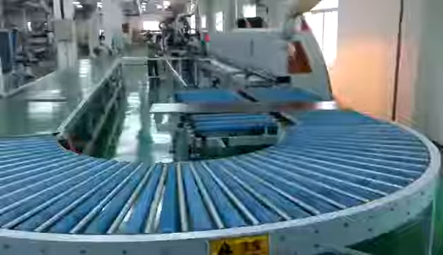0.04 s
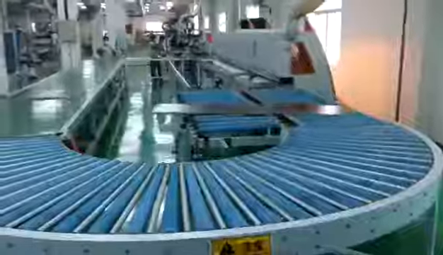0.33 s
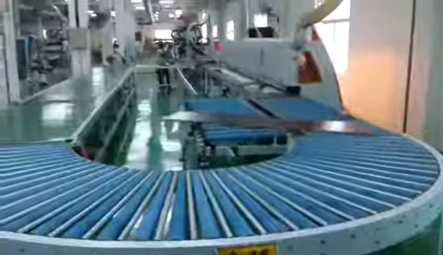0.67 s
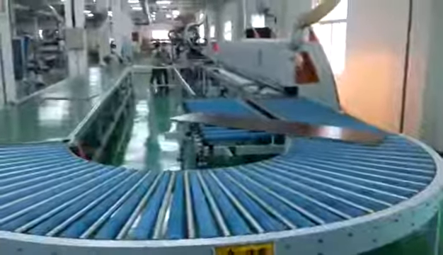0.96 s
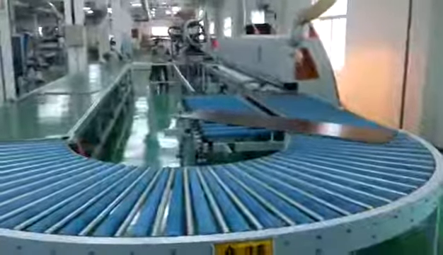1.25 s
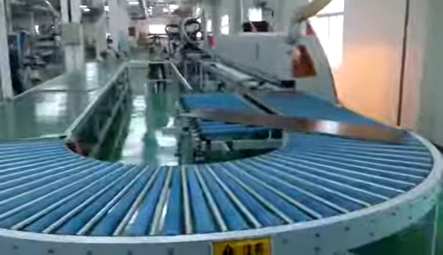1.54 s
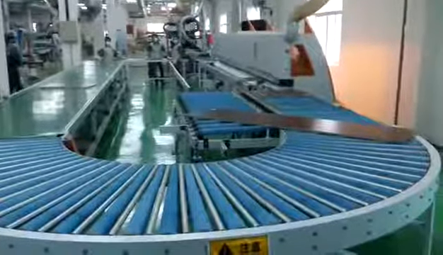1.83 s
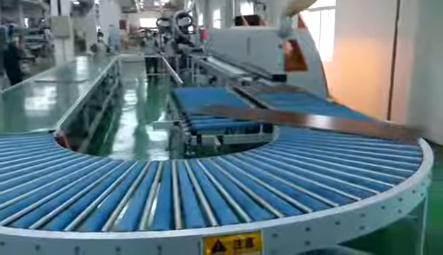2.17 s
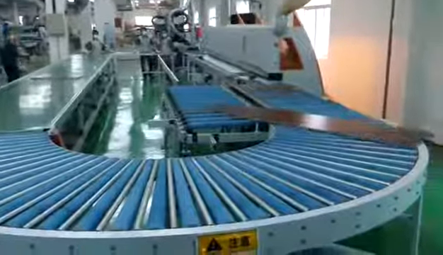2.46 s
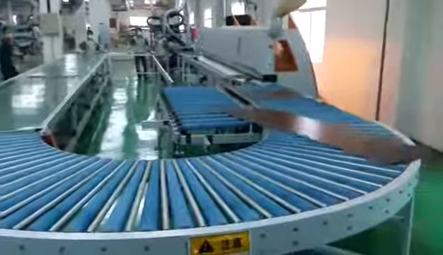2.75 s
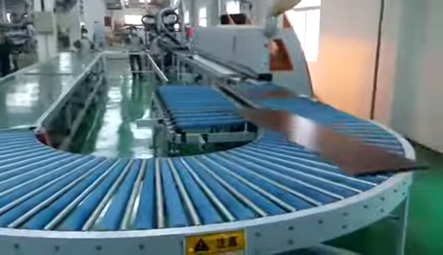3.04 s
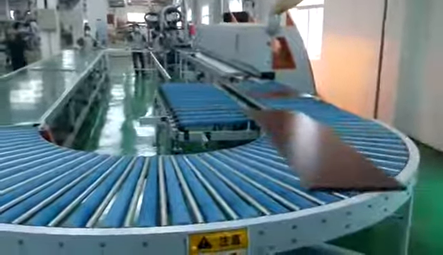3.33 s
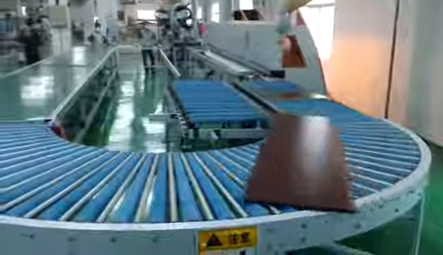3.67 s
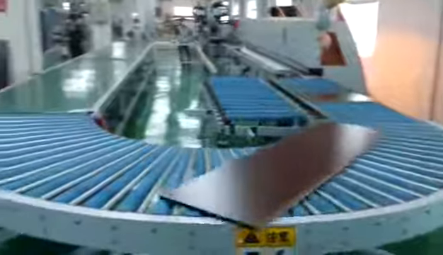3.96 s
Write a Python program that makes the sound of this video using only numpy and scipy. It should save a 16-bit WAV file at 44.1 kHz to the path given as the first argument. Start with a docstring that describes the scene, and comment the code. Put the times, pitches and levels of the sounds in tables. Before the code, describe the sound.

Dense woodworking machine noise fills a factory hall, with rasping cutters, hissing air and a whine. Close by, a roller conveyor rumbles and ticks; a board chatters on it, brushes the rail, then bumps dully near the end.

```python
"""Woodworking line in a factory hall

Cutters rasp, air rushes through the extraction, a spindle whines and motors hum. Close by, a roller
conveyor rumbles and carries a long board round its curve towards the listener; the board chatters,
brushes the rail, shudders and bumps. The broad sounds are noise shaped by filters.
The sound cuts in after a quarter second and swells to its full level."""
import sys
import numpy as np
from scipy import signal
from scipy.fft import rfft, irfft, next_fast_len
from scipy.io import wavfile
from scipy.ndimage import uniform_filter1d, map_coordinates

SR = 44100
rng = np.random.default_rng(int(sys.argv[2]) if len(sys.argv) > 2 else 0)


def inscribe(sig):
    """Save sig as 16-bit PCM at rate SR to the path in sys.argv[1].

    A 1-D sig is mono; a 2-D sig holds one channel per row.
    Samples are clipped to [-1, 1] before scaling.
    """
    pcm = np.round(np.clip(np.atleast_2d(sig).T, -1, 1) * 32767)
    wavfile.write(sys.argv[1], SR, pcm.astype(np.int16))


N = 176400

# machine levels before trims: time_s, roar_db, rasp_db, low_hiss_db, high_hiss_db
MACHINE_LEVELS = [(.45, -25.5, -24.5, -32, -28.5), (.6, -25.5, -24.5, -30.5, -27),
                  (.95, -24.5, -24.5, -32.5, -28.5), (1.09, -28.5, -25.2, -33.5, -31.5),
                  (1.18, -24, -24, -30, -28), (1.38, -28, -26, -34, -29), (1.5, -25.5, -24, -31.5, -29.3),
                  (1.9, -25.5, -24, -31, -29), (2.1, -25, -24.5, -33.5, -29.5),
                  (2.27, -27.5, -23.5, -31, -28.5), (2.54, -23.5, -25.5, -31, -30.5),
                  (2.63, -25, -23, -29.5, -30), (2.88, -26.5, -25.2, -31.5, -29.5),
                  (3, -29, -27.5, -33, -28.5), (3.15, -30, -26.5, -32.5, -28.5),
                  (3.5, -25.5, -24.5, -30, -29), (3.75, -27, -25.5, -31.6, -28.5), (4, -27, -26, -32, -30)]
# broad spectra of roar, rasp and hiss: frequency_hz, gain_db
ROAR_SPECTRUM = [(150, -26.5), (265, -5.5), (420, 0), (650, -7.5), (900, -2.5), (1150, 0.36), (1400, -3),
                 (1640, -11.5), (2000, -56)]
RASP_SPECTRUM = [(1450, -48), (1670, -7.5), (2050, -8), (2350, -4), (2750, .5), (2950, -12.5), (3250, -9),
                 (3450, -27.5), (3800, -53)]
LOW_HISS_SPECTRUM = [(2700, -31.5), (3300, -3), (3600, 0), (4200, -3), (4800, -1.5), (5300, -3), (5700, -2),
                     (5900, -13), (6400, -46)]
# the high hiss has a recorder's notch near 8 kHz: frequency_hz, gain_db
HIGH_HISS_SPECTRUM = [(5400, -48), (5750, -0.5), (6000, 4.5), (6400, -2), (7000, 0), (7400, -3), (7670, 1),
                      (7740, -7.5), (7830, -22.5), (8020, -57.5), (8300, -10), (8650, -19.5), (9100, -37.5)]
# resonances and notches: centre_hz, width_hz, gain_db
HOUSING_MODES = [(429, 18, -4.7), (493, 29, 6.8), (517, 14, 4.5), (633, 23, 5.7), (693, 36, 3.6),
                 (781, 14, 3.6), (865, 23, 4.5), (941, 18, -8.0), (1049, 29, -13.2), (1117, 29, -7.4),
                 (1161, 23, -4.4), (1273, 18, -6.0), (1405, 29, -4.1), (1533, 36, -2.4)]
CUTTER_MODES = [(1739, 14, -4.7), (1811, 58, 4.7), (1871, 23, 4.1), (1975, 23, 4.7), (2151, 23, 4.4),
                (2215, 23, 5.1), (2323, 36, 7.7), (2607, 14, -5.8), (2739, 23, -9.4), (2951, 14, 3.9),
                (3019, 36, 3.6), (3067, 23, -5.2), (3175, 18, -2.7), (3259, 23, -6.1)]
DUCT_MODES = [(3515, 36, 5.2), (3635, 58, 6.2), (3959, 18, -7.3), (4003, 36, 7.7), (4059, 18, -4.9),
              (4119, 36, 5.0), (4383, 23, 3.6), (4507, 45, 4.9), (4635, 36, 3.4), (4751, 58, -3.9),
              (4943, 14, -6.4), (5051, 14, -6.3), (5355, 36, 7.4), (5471, 58, 4.9)]
NOZZLE_MODES = [(5751, 18, -5.0), (5931, 18, -6.1), (6039, 18, -7.9), (6227, 23, 3.6), (6271, 18, -6.8),
                (6327, 58, 9.4), (6451, 45, 5.8), (6683, 36, 7.0), (6807, 58, 4.5), (6911, 18, -3.9),
                (7199, 58, 6.6), (7259, 18, -5.7), (7323, 36, 8.5), (7607, 14, -9.2)]
ROLLER_FRAME_MODES = [(880, 29, 8), (994, 29, 7.5), (1250, 35, 5.5), (2340, 36, 2)]
# spectral lines of motors and tools: pitch_hz, width_hz, level_db
HUM_LINES = [(97, 1.8, -37.5), (198, 2, -44), (388, 2, -41), (2332, 3, -44), (2407, 3, -42.5),
             (2653, 3, -41.5), (2783, 3, -47)]
# envelopes of spindle, air whistle and rumble (before its trim): time_s, level_db
WHINE_LEVELS = [(.45, -29.5), (.7, -29.5), (1.65, -28), (2.1, -33.5), (2.6, -34), (3.1, -40), (3.55, -49),
                (3.8, -36.5), (4, -35)]
WHISTLE_LEVELS = [(.5, -46), (.8, -44), (1.2, -47.5), (2.92, -48), (3.01, -33), (3.11, -46), (3.21, -45),
                  (3.27, -34), (3.37, -47), (3.56, -42), (3.7, -50)]
RUMBLE_LEVELS = [(.45, -32), (.7, -29.5), (1.1, -31.5), (1.4, -28), (1.7, -32), (2.3, -31), (2.85, -32),
                 (3.15, -34.5), (3.48, -29.5), (3.6, -23), (3.8, -27.5), (4, -27)]
# broad spectra of rumble, ticks and the board's sounds: frequency_hz, gain_db
RUMBLE_SPECTRUM = [(15, -48.5), (35, -16.5), (60, -11), (85, 0), (120, 1), (160, -2.5), (230, -6.5),
                   (330, -18), (600, -58.5)]
TICK_SPECTRUM = [(300, -18.5), (800, 1.5), (2600, 2.5), (4000, 0), (7400, -0.5), (7900, -39.5)]
CHATTER_SPECTRUM = [(250, -27), (400, -7.5), (620, -4.5), (880, 1.5), (1300, -1), (1700, -10.5),
                    (2500, -4.5), (3200, -17), (4500, -42)]
BRUSH_SPECTRUM = [(2500, -32.5), (4100, -3), (4900, -0.5), (6000, -1.5), (7500, -12), (7900, -34.5)]
BUMP_SPECTRUM = [(35, -35), (70, -3.5), (110, 6), (190, -7), (330, -6.5), (450, -18.5), (900, -47.5)]
# the board's contacts with rollers and rail: start_s, length_s, level_db
ROLLER_CHATTERS = [(2.2, .2, -30), (2.52, 0.5, -33.5)]
RAIL_BRUSHES = [(2.927, 0.63, -32.5)]
# its shudders against the frame: start_s, length_s, pitch_hz, level_db
FRAME_SHUDDERS = [(2.93, 0.33, 35.3, -35), (3.504, 0.15, 52, -30)]
# its bumps over the rollers: start_s, strength_db
ROLLER_BUMPS = [(3.555, -25.5), (3.65, -30), (3.89, -28.5)]

TIME_S = np.arange(N) / SR


def amp(db):
    """Amplitude grows tenfold for every 20 dB."""
    return 10 ** (np.asarray(db) / 20)


def unit_rms(x):
    """Normalisation to rms 1."""
    return x / np.sqrt(np.mean(x ** 2) + 1e-20)


def spectrum_db(points, hz):
    """Interpolation of gain on a logarithmic frequency axis."""
    point_hz, gain_db = np.transpose(points)
    return np.interp(np.log(hz + 1), np.log(point_hz + 1), gain_db)


def envelopes(rows):
    """Linear interpolation in time of each level column."""
    times, *columns = np.transpose(rows)
    return [np.interp(TIME_S, times, column) for column in columns]


def wobble(per_s):
    """Smooth random modulation: a spline through per_s knots a second."""
    knots = rng.standard_normal(int(N * per_s / SR) + 4)
    return map_coordinates(knots, [TIME_S * per_s])


def filtered(x, response):
    """Linear filtering: the spectrum is multiplied by a frequency response."""
    size = next_fast_len(N + SR // 2)
    return irfft(rfft(x, size) * response(np.fft.rfftfreq(size, 1 / SR)), size)[:N]


def rush(spectrum, modes=(), *, patchy_db):
    """Source and filter: noise with patches of random gain, shaped by spectrum and modes, at rms 1."""
    def response(f):
        resonance_db = sum(db * np.exp(-((f - hz) / width) ** 2) for hz, width, db in modes)
        return amp(spectrum_db(spectrum, f) + resonance_db)

    cells = signal.stft(rng.standard_normal(N), nperseg=512)[2]
    patches = uniform_filter1d(rng.standard_normal(cells.shape), size=7, axis=0)
    patches = unit_rms(uniform_filter1d(patches, size=9, axis=1))
    noise = signal.istft(cells * amp(patchy_db * patches), nperseg=512)[1][:N]
    return unit_rms(filtered(noise, response))


def blurred_tone(hz, width_hz):
    """Narrow-band noise of rms 1 is heard as an unsteady tone, blurred by the hall."""
    return unit_rms(filtered(rng.standard_normal(N), lambda f: 1 / (1 + ((f - hz) / width_hz) ** 2)))


def arch(start_s, length_s):
    """A half-sine envelope."""
    return np.sin(np.pi * np.clip((TIME_S - start_s) / length_s, 0, 1))


def strokes(rows):
    """The envelope of sustained contact: one steep-sided arch a row."""
    return sum(amp(db) * np.sqrt(abs(arch(start, length))) for start, length, db in rows)


def machine():
    """Common modulation: load flutters housing roar and cutter rasp, air flow the two hisses."""
    roar_db, rasp_db, low_db, high_db = envelopes(MACHINE_LEVELS)
    load_db, flow_db = 0.31 * wobble(24.23), 0.49 * wobble(18)
    roar = amp(roar_db - 0.5 + load_db) * rush(ROAR_SPECTRUM, HOUSING_MODES, patchy_db=1.4)
    rasp = amp(rasp_db + 0.2 + load_db) * rush(RASP_SPECTRUM, CUTTER_MODES, patchy_db=0.47)
    low_hiss = amp(low_db + 0.47 + flow_db) * rush(LOW_HISS_SPECTRUM, DUCT_MODES, patchy_db=0.9)
    high_hiss = amp(high_db + 0.17 + flow_db) * rush(HIGH_HISS_SPECTRUM, NOZZLE_MODES, patchy_db=0.66)
    return roar + rasp + low_hiss + high_hiss


def spindle_whine(pitch_hz=799.6):
    """Periodic rotation gives a tone and a faint octave; scattering in the hall blurs the tone."""
    phase = 2 * np.pi * np.cumsum(pitch_hz + 0.34 * wobble(4.05)) / SR
    scatter = 0.46 * blurred_tone(pitch_hz, width_hz=11)
    whine = amp(envelopes(WHINE_LEVELS)[0]) * (np.sqrt(2) * np.sin(phase) + scatter)
    octave = amp(-46.5 + 4.9 * wobble(7)) * np.sqrt(2) * np.sin(2 * phase)
    return whine + octave


def motor_hum():
    """Motors and tools at steady speed radiate a line spectrum."""
    return sum(amp(db) * blurred_tone(hz, width) for hz, width, db in HUM_LINES)


def air_whistle():
    """Flow noise confined to a narrow band is heard as a thin whistle."""
    return amp(envelopes(WHISTLE_LEVELS)[0]) * blurred_tone(hz=4997, width_hz=16)


def roller_rumble(trim_db=-1.5):
    """Rolling contact makes low noise, stronger under the nearing board."""
    level_db = envelopes(RUMBLE_LEVELS)[0] + trim_db + 0.63 * wobble(20)
    return amp(level_db) * rush(RUMBLE_SPECTRUM, patchy_db=0.6)


def roller_ticks(per_s=90, decay_s=0.0037, spread_db=4, level_db=-36):
    """Rollers tick in their seats as a Poisson process, each impact a decaying burst of noise."""
    impacts = (rng.random(N) < per_s / SR) * amp(spread_db * rng.standard_normal(N))
    decays = signal.lfilter([1], [1, -np.exp(-1 / (decay_s * SR))], impacts)
    bursts = decays * rng.standard_normal(N)
    return amp(level_db) * unit_rms(filtered(bursts, lambda f: amp(spectrum_db(TICK_SPECTRUM, f))))


def board_chatter(depth_db=3.5):
    """Unsteady contact excites resonances of rollers and frame as the board swings into the curve."""
    envelope = strokes(ROLLER_CHATTERS) * amp(depth_db * wobble(45))
    return envelope * rush(CHATTER_SPECTRUM, ROLLER_FRAME_MODES, patchy_db=5.5)


def board_brush():
    """Sliding friction of the board's edge on the rail makes a hiss."""
    return strokes(RAIL_BRUSHES) * rush(BRUSH_SPECTRUM, patchy_db=3)


def board_shudder():
    """The board vibrates against the frame in low notes, roughened by phase modulation."""
    notes = np.zeros(N)
    for start, length, hz, db in FRAME_SHUDDERS:
        phase = 2 * np.pi * hz * (TIME_S - start) + 0.4 * wobble(24)
        notes += amp(db) * arch(start, length) * np.sqrt(2) * np.sin(phase)
    return notes


def board_bumps(rise_s=0.0071, fall_s=0.049):
    """Impacts on the rollers excite the board's dull body; damping makes each die exponentially."""
    envelope = np.zeros(N)
    for start, db in ROLLER_BUMPS:
        age_s = np.maximum(TIME_S - start, 0)
        envelope += 2 * amp(db) * (1 - np.exp(-age_s / rise_s)) * np.exp(-age_s / fall_s)
    return envelope * rush(BUMP_SPECTRUM, patchy_db=1.0)


def scene():
    """Superposition: the pressures of all sources add at one point."""
    machinery = machine() + spindle_whine() + motor_hum() + air_whistle()
    conveyor = roller_rumble() + roller_ticks()
    board = board_shudder() + board_bumps() + board_brush() + board_chatter()
    return (machinery + conveyor + board)[None]


def record(dry, start_s=0.2643, swell_s=0.18, foot_db=-12.5, top_hz=9076):
    """Gating and band limiting: silence, a cut-in with a short swell, and no treble above top_hz."""
    age_s = TIME_S - start_s
    gate = (age_s > 0) * amp(foot_db * np.clip(1 - age_s / swell_s, 0, 1))
    return filtered(dry[0] * gate, lambda f: f < top_hz)[None]


dry = scene()
out = record(dry)
inscribe(out)
```